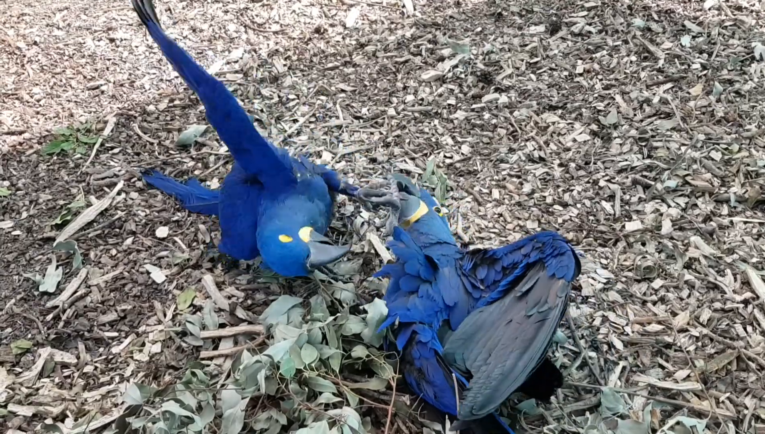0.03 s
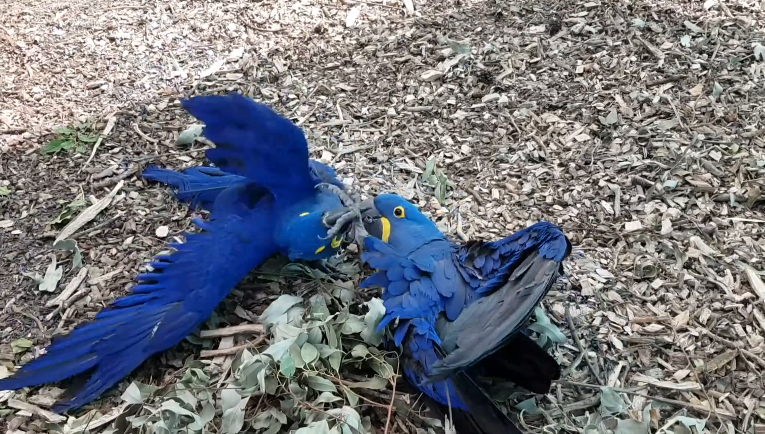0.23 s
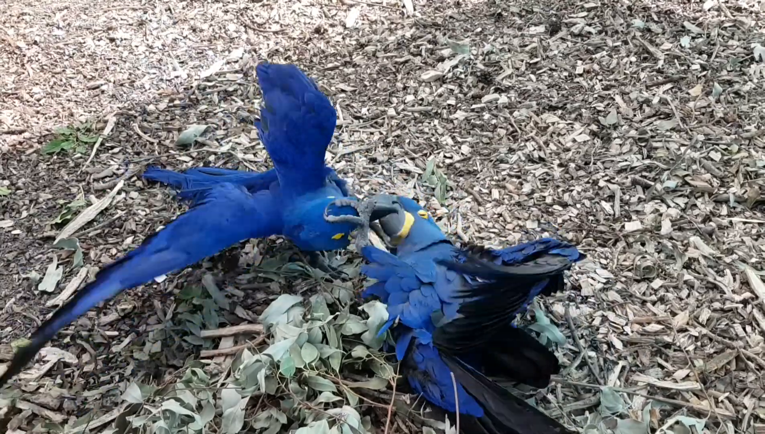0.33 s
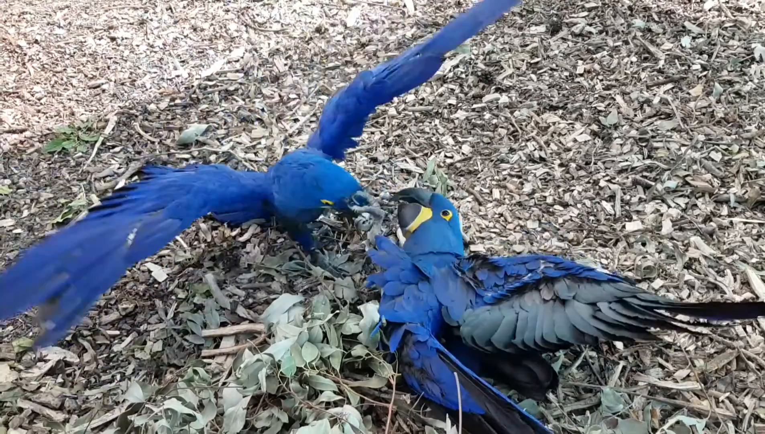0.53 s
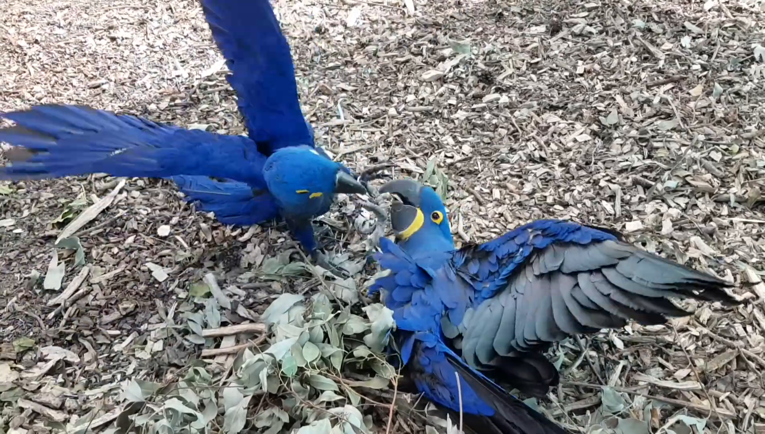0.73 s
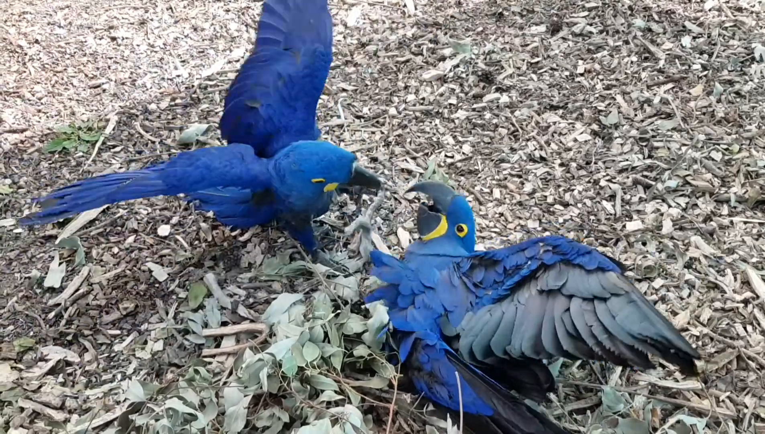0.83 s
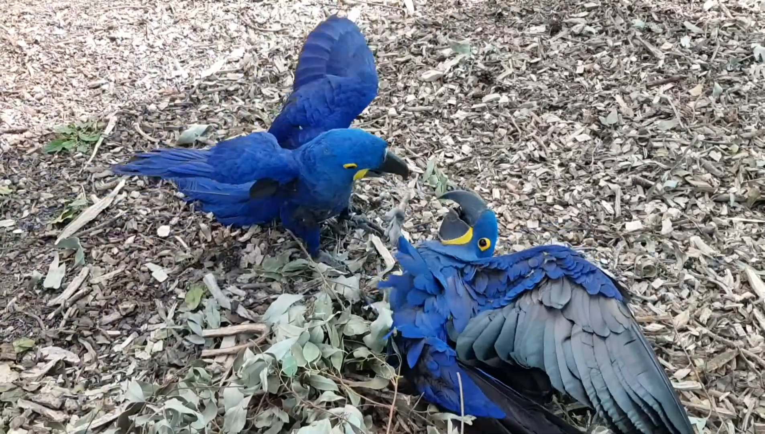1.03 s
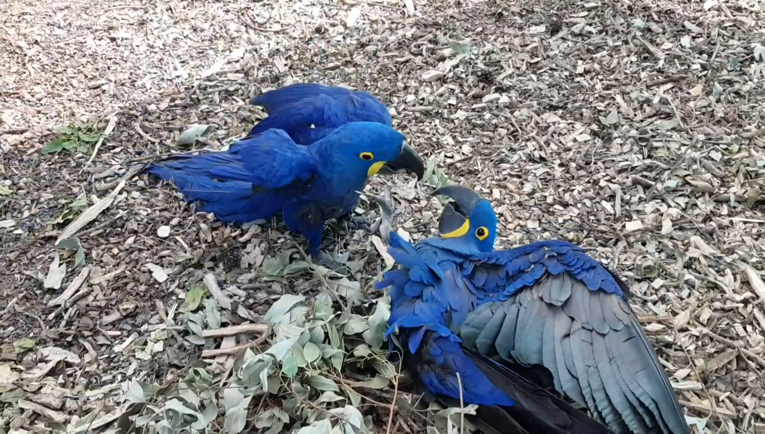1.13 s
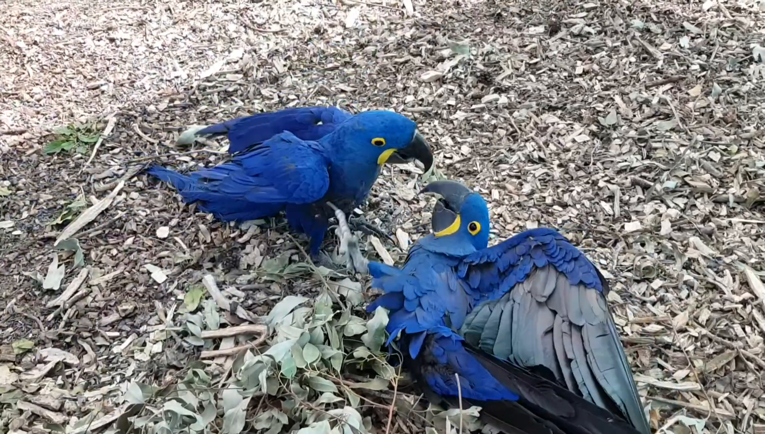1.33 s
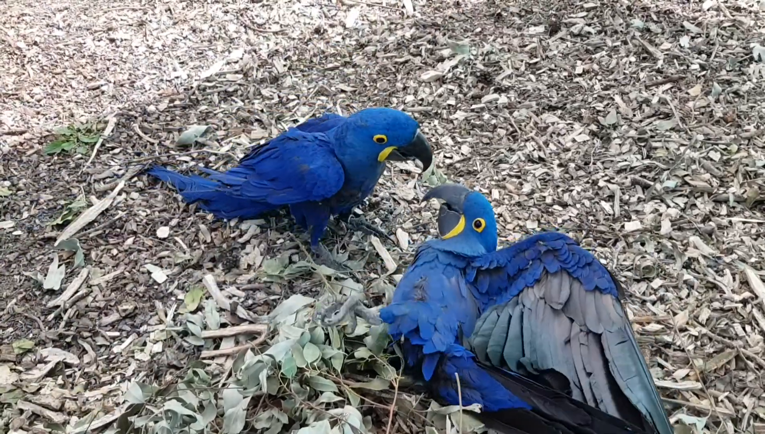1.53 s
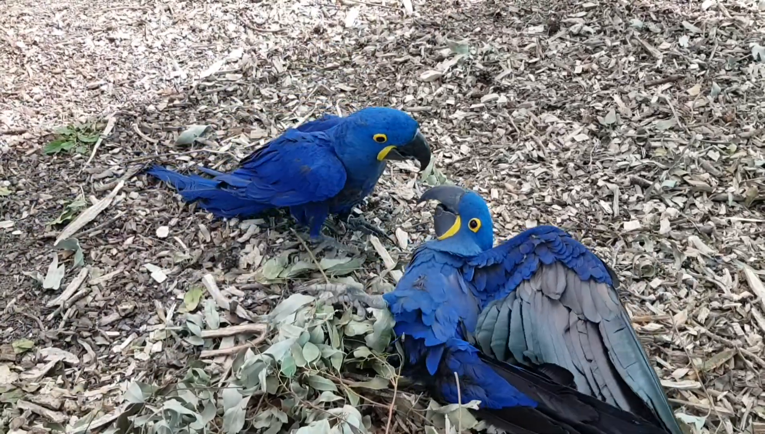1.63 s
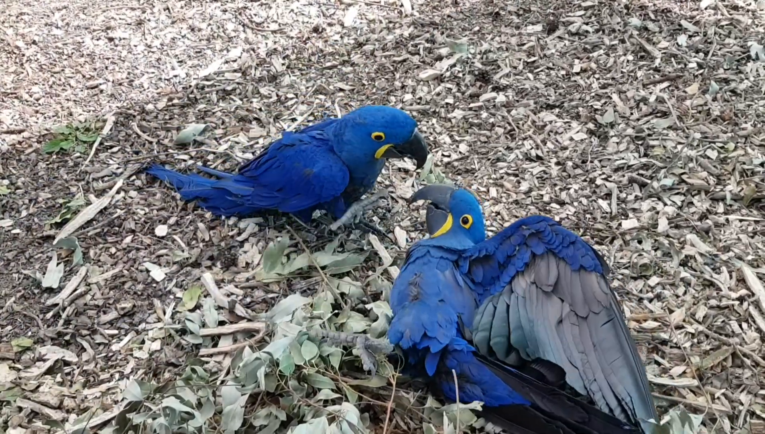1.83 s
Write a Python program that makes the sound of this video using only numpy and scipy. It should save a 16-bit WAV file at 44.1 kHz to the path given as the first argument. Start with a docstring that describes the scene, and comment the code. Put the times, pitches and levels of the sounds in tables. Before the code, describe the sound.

Close to the microphone, a large parrot lets out one raspy squawk followed by a lower, rough call. Soft wing rustles and small knocks on wood chips follow, with faint distant chirps over a low aviary rumble.

```python
"""An aviary: two macaws scuffle on wood chips close by. One gives a loud squawk that keeps breaking
from tone into rasp, then a lower, stuttering growl. Both are air puffs from the syrinx ringing the
throat, whose resonances move with the beak. Feathers rustle, wings sweep, the ground knocks and
chips snap. Small birds whistle farther off, over a rumble and a low hum."""
import sys
import numpy as np
from scipy import signal
from scipy.fft import rfft, irfft, next_fast_len
from scipy.io import wavfile
from scipy.ndimage import uniform_filter1d, map_coordinates

SR = 44100
rng = np.random.default_rng(int(sys.argv[2]) if len(sys.argv) > 2 else 0)


def wrap_up_sound(samples):
    """Save the sound to the file named by the first command line argument, as 16-bit audio."""
    columns = np.atleast_2d(samples).T
    # keep every value between -1 and 1, then stretch to whole-number steps
    tamed = np.clip(columns, -1, 1)
    steps = np.round(tamed * 32767).astype(np.int16)
    wavfile.write(sys.argv[1], SR, steps)


N = 83790
FLUTTER_HZ = 220  # rate of the macaw's random pitch and level flutter


def macaw(echo_db=-25, coo_echo_db=-13, left_lead_s=5e-5):
    """Squawk, growl and coos, close and slightly left, with early and diffuse echoes."""
    # Each row: frequency in Hz, left minus right in dB.
    pan = [(300, 1), (1500, 1), (2400, -1.5), (3100, -6), (3700, -3.5), (4250, -2), (4650, -14), (5300, 3),
           (6500, 10.5), (10000, 13.5), (11500, -5), (16000, 1.5)]

    def placement(hz):
        lead = np.exp(1j * np.pi * hz * left_lead_s * np.array([[1], [-1]]))
        return sides(along(pan, hz)) * lead

    voice = amp(-1) * squawk() + growl()
    coo = coos()
    early = amp(-9) * ground_bounce(voice)
    near = filtered(voice + coo + early, placement)
    return near + aviary(amp(echo_db) * voice + amp(coo_echo_db) * coo)


def squawk():
    """Loud call flipping between tone and rasp as the beak opens wide and narrows again."""
    # Each row: time in seconds, pitch in Hz, roughness (clipped to 0-1).
    voice = [(.17, 398.6, 0.82), (.212, 464.8, .85), (.228, 480.5, 0.22), (.244, 504.3, 0.38),
             (.253, 515.4, 0.06), (.267, 536.6, 0.07), (.276, 516.4, 0.78), (.293, 538.3, 1.11),
             (.298, 563, 0.03), (.308, 591, 0.06), (.313, 534, 0.33), (.324, 602.3, 0), (.329, 559.5, 0.48),
             (.344, 602, 0), (.351, 627, 0), (.356, 590, .65), (.375, 591.4, 0.9), (.38, 607, 0.02),
             (.389, 622, 0), (.398, 554.4, 0.85), (.411, 553.4, 0.99), (.417, 555.7, 0), (.424, 563, 0.2),
             (.432, 562.6, 0.74), (.47, 522, 0.65)]
    # Each row: time in seconds, relative level in dB.
    level = [(.168, -47.5), (.194, -25), (.249, -15.5), (.253, -15), (.352, -12), (.388, -14), (.41, -16.5),
             (.421, -15), (.432, -20.5), (.445, -24), (.475, -38.5)]
    # Each row: time in seconds, beak opening 0-1.
    beak = [(.17, 0), (.21, 0.27), (.26, 0.47), (.3, 0.76), (.345, 1), (.425, 0.84), (.455, 0.2)]
    # Throat response. Each row: Hz and dB with the beak nearly closed, Hz and dB wide open.
    throat = [(109, -23, 79, -35.5), (266.5, 3, 300, -16), (414, 2, 370, -15.5), (720, -12, 760, -4.5),
              (1010, 0, 1100, 6.5), (1200, -2, 1500, -1.5), (1448, -4, 2000, -0.5), (1960, 0, 2000, -10.5),
              (2210, -23, 2700, -1.5), (2430, -13.5, 2750, -8), (2900, -8, 3550, -2),
              (3030, -35, 4700, -7.5), (4060, -17.5, 4520, -13.5), (4730, -33.5, 5100, -24),
              (5280, -27.5, 6200, -34.5), (6300, -47, 6400, -39.5), (7440, -43, 7100, -27),
              (8300, -55.5, 7700, -46), (9450, -45.5, 11000, -35.5), (11000, -55, 10000, -45),
              (13200, -45.5, 14000, -32), (14000, -58.5, 13800, -48.5)]
    return call(voice, level, beak, throat)


def growl():
    """Lower, stuttering call through a closing beak."""
    # Each row: time in seconds, pitch in Hz, roughness (clipped to 0-1).
    voice = [(.521, 599.6, 0.39), (.526, 662, 0.79), (.538, 609.7, 0.16), (.549, 549.4, 0.05),
             (.563, 614.3, 0.08), (.579, 477.3, 0.63), (.594, 488.2, 1), (.602, 479, 0), (.613, 433.5, 0),
             (.622, 464, 1.21), (.645, 469, 0.68), (.654, 448, 0), (.664, 441.7, 0.22), (.674, 460.7, .75),
             (.696, 454, 0.17), (.708, 430, 0.4), (.727, 432.6, 0), (.745, 424.8, 0.5), (.762, 438.8, .5),
             (.79, 406, 0.39)]
    # Each row: time in seconds, relative level in dB.
    level = [(.518, -37.5), (.529, -25.5), (.547, -16), (.556, -20.5), (.564, -13.5), (.574, -22),
             (.596, -25.5), (.604, -20), (.62, -28), (.648, -34.5), (.653, -20.5), (.668, -27.5),
             (.678, -25.5), (.697, -27.5), (.717, -37), (.727, -31), (.765, -28.5), (.773, -42),
             (.82, -58.5)]
    # Each row: time in seconds, beak opening 0-1.
    beak = [(.52, 0.96), (.565, .88), (.6, 0.8), (.69, 0.6), (.765, 0.02)]
    # Throat response. Each row: Hz and dB with the beak nearly closed, Hz and dB wide open.
    throat = [(110, -19, 110, -43), (267, -6, 300, -16), (410, -8, 840, -13.5), (865, -11, 950, -19),
              (1095, -12, 1100, -4.5), (1397, -10, 1390, -12), (1780, 5.5, 1770, 4),
              (2023, -8.5, 2110, -4.5), (2160, -7.5, 2380, -16), (2450, -23, 2650, -40),
              (2950, -25, 3250, -17.5), (3600, -35, 3230, -26), (4070, -18, 4500, -22.5),
              (4800, -21.5, 5150, -49.5), (5100, -28.5, 5800, -24.5), (5800, -44, 6250, -49.5),
              (8800, -50, 9040, -43.5), (8950, -48, 9950, -27.5), (9400, -44, 10600, -43),
              (16000, -56.5, 16000, -59)]
    return call(voice, level, beak, throat)


def call(voice, level, beak, throat, tremble=.13, catch_s=.0022, closing_per_db=.1, shapes=7):
    """Puffs ring the throat; rasp shakes the beak opening; a catch dips and dulls the sound."""
    # Catches of the voice. Each row: time in seconds, relative depth in dB.
    catches = [(.272, 8), (.295, 9), (.312, 9), (.329, 9), (.34, 4), (.377, 7), (.396, 10), (.412, 4),
               (.433, 6), (.552, 6), (.67, 8)]
    t = np.arange(N) / SR
    puffs, rough = syrinx(voice), curves(voice)[1]
    catch_db = sum(db * np.exp(-((t - s) / catch_s) ** 2) for s, db in catches)
    catch_db -= uniform_filter1d(catch_db, size=1800)  # keeps the mean level
    opening = curves(beak)[0] + tremble * rough * wobble(170) - closing_per_db * catch_db
    opening = np.clip(opening, 0, 1)
    closed, opened = np.hsplit(np.array(throat, float), 2)
    sound = np.zeros(N)
    for step in np.linspace(0, 1, shapes):  # crossfade between throat shapes
        weight = np.maximum(1 - np.abs(opening - step) * (shapes - 1), 0)
        sound += weight * resonate(puffs, closed + step * (opened - closed))
    power = np.abs(uniform_filter1d(uniform_filter1d(sound ** 2, 300), 300))
    flutter_db = 1.4 * np.tanh(wobble(FLUTTER_HZ)) * (.5 + 2 * rough)
    envelope = amp(curves(level)[0] + flutter_db - catch_db) * during(level)
    return sound / np.sqrt(power + 1e-9) * envelope


def syrinx(voice, waver=.02, jitter_cycles=.17, scatter_db=3.5, air_gain=.25, spread_s_per_hz=3e-7):
    """One puff per cycle; roughness scatters their timing and size and adds air noise."""
    hz, rough = curves(voice)
    rough = np.clip(rough, 0, 1)
    cycles = np.cumsum(hz * (1 + waver * wobble(FLUTTER_HZ))) / SR
    onsets = np.interp(np.arange(1, int(cycles[-1])), cycles, np.arange(N))
    i = onsets.astype(int)
    timing, size = rng.uniform(-1.053, 1, (N // 32, 2))[:len(onsets)].T * np.sqrt(3)
    onsets += jitter_cycles * rough[i] * timing * SR / hz[i]
    taps = onsets.astype(int)[:, None] + np.arange(-7, 9)
    offset = taps - onsets[:, None]
    pulse = np.sinc(offset) * np.cos(np.pi * offset / 16) ** 2  # band-limited
    strength = amp(scatter_db * np.sqrt(rough[i]) * size)
    puffs = np.bincount(np.clip(taps, 0, N - 1).ravel(), (pulse * strength[:, None]).ravel(), N)
    air = rng.standard_normal(N) * (1 + np.cos(2 * np.pi * cycles)) * np.sqrt(hz / SR)
    flow = puffs + air_gain * rough * air
    # The treble of each puff leaves the beak slightly later.
    return filtered(flow, lambda f: (f > 60) * np.exp(-1j * np.pi * spread_s_per_hz * f ** 2))


def coos(waver=.025):
    """Soft, unsteady gliding tones before and beneath the growl."""
    # Each row: start in seconds, length in seconds, first and last pitch in Hz, level in dB.
    glides = [(0.482, 0.052, 483, 516, -37.5), (.612, 0.029, 617, 648, -41),
              (0.655, 0.052, 640, 704, -41.5), (.705, 0.045, 451.7, 416, -39)]
    t, out = np.arange(N) / SR, np.zeros(N)
    for s, length_s, first_hz, last_hz, db in glides:
        progress = np.clip((t - s) / length_s, 0, 1)
        hz = (first_hz + progress * (last_hz - first_hz)) * (1 + waver * wobble(FLUTTER_HZ))
        out += amp(db) * np.sqrt(2 * np.abs(np.sin(np.pi * progress))) * sine(hz)
    return out


def rustle(gain_db=4):
    """Feathers brush over the chips: a grainy hiss."""
    # Each row: time in seconds, relative level in dB.
    level = [(.04, -55), (.2, -41.5), (.32, -47), (.89, -66), (.94, -66), (.97, -50.5), (1.036, -64),
             (1.18, -52.5), (1.242, -60.5), (1.3, -56.5), (1.41, -69), (1.466, -52), (1.544, -61),
             (1.68, -59), (1.9, -69)]
    # Each row: frequency in Hz, relative level in dB.
    spectrum = [(150, 0), (400, -2), (900, -3.5), (2000, -1), (4400, -0.5), (5700, -4), (7300, -3.5),
                (8600, -8), (11000, -1), (15500, -6.5)]
    # Each row: frequency in Hz, left minus right in dB.
    pan = [(500, 2.5), (4500, -6), (7000, 15.5), (10000, 7), (15000, 4.5)]
    grains = rng.standard_normal((2, N)) * amp(3 * wobble(350) + 1.6 * wobble(45))
    hiss = unit(filtered(grains, lambda hz: amp(along(spectrum, hz)) * sides(along(pan, hz))))
    return hiss * amp(curves(level)[0] + gain_db)


def scuffle(snap_t60_s=.0062, pan_db=3, echo_db=-15):
    """Blows ring the ground dully; wood chips snap in dry noise bursts."""
    # Each row: start in seconds, relative level in dB, contact time in seconds.
    knocks = [(0.057, -32.5, 0.0011), (1.459, -37.5, 0.00077), (1.477, -41.5, 0.00066),
              (1.483, -43.5, .0008), (1.514, -46.5, 0.0011)]
    # Ground modes. Each row: mean frequency in Hz, relative level in dB, T60 in seconds.
    modes = [(330, -2, .04), (460, -2, .022), (620, -8, .014), (1200, -16, .012), (2300, -20, .012)]
    # Each row: start in seconds, relative level in dB, centre in Hz.
    snaps = [(.837, -40, 5800), (0.959, -45.5, 9000), (1.46, -44.5, 7000), (1.795, -49, 11840)]
    t, out = np.arange(SR // 8) / SR, np.zeros(N + SR)
    for s, db, contact_s in knocks:
        attack = 1 - np.exp(-(t / contact_s) ** 2)
        ring = sum(amp(db + mode_db - 60 * t / t60_s) * np.sin(2 * np.pi * hz * rng.normal(1, .16) * t)
                   for hz, mode_db, t60_s in modes)
        out[round(s * SR):][:len(t)] += attack * ring
    for s, db, hz in snaps:
        band = signal.iirpeak(hz, Q=1.5, fs=SR)
        snap = unit(signal.lfilter(*band, rng.standard_normal(len(t))))
        out[round(s * SR):][:len(t)] += snap * amp(db - 60 * t / snap_t60_s)
    return sides(pan_db) * out[:N] + amp(echo_db) * aviary(out[:N])


def wings(half_width_oct=.33):
    """Wings and tails sweep the air and the chips: soft swells of band noise."""
    # Each row: peak time in seconds, length in seconds, centre in Hz, level in dB.
    sweeps = [(.13, .4, 80, -54), (.463, .03, 190, -46), (.775, .05, 170, -54), (.795, .06, 3400, -48)]
    t, out = np.arange(N) / SR, np.zeros(N)
    for s, length_s, hz, db in sweeps:
        noise = rng.standard_normal(N)
        air = unit(filtered(noise, lambda f: 1 / (1 + (np.log2((f + 1) / hz) / half_width_oct) ** 2)))
        out += air * amp(db) * np.exp(-(2 * (t - s) / length_s) ** 2)
    return out


def small_birds(notes_db=-1, echo_db=-7, droop_per_s=.37):
    """Far birds: two long whistles and scattered short, drooping notes; the two low notes near 1.2 s ring on
    after the macaw's calls."""
    # Whistles. Each row: time in seconds, pitch in Hz, relative level in dB.
    falling = [(.875, 3600, -63.5), (.902, 4364, -48), (.927, 4634, -46.5), (.95, 4210, -48),
               (.98, 3785, -63), (1.0, 3183, -52), (1.036, 2690, -47.5), (1.055, 2240, -52.5),
               (1.07, 1680, -54.5), (1.1, 1565, -76.5)]
    rising = [(1.572, 2620, -72), (1.583, 2580, -49), (1.6, 2536, -47), (1.62, 2330, -48),
              (1.645, 2317, -49.5), (1.665, 2394, -45), (1.69, 2810, -45), (1.708, 3030, -43),
              (1.726, 3350, -47.5), (1.74, 3456, -55)]
    # Each row: start in seconds, length in seconds, pitch in Hz, relative level in dB.
    short_notes = [(1.175, .075, 490, -54), (1.18, .06, 1620, -58), (1.38, .08, 6320, -56),
                   (1.75, .05, 4550, -55), (1.75, .1, 6800, -56)]
    t, notes = np.arange(N) / SR, np.zeros(N)
    waver = .014 * wobble(400)
    for s, length_s, hz, db in short_notes:
        droop = droop_per_s * (t - s - length_s / 2)
        envelope = np.sin(np.pi * np.clip((t - s) / length_s, 0, 1))
        notes += amp(db + notes_db) * envelope * sine(hz * (1 + waver - droop))
    return (whistle(falling, waver=.03214, echo_db=-1, pan_db=-4)
            + whistle(rising, waver=.0275, echo_db=-1.5, pan_db=-3)
            + notes + amp(echo_db) * aviary(notes))


def whistle(rows, waver, echo_db, pan_db):
    """A far bird's wavering pure tone in its echoes."""
    hz, db = curves(rows)
    tone = np.sqrt(2) * sine(hz * (1 + waver * wobble(350)))
    tone *= amp(db + 3.5 * wobble(170) - 2.5) * during(rows)
    return sides(pan_db) * (tone + amp(echo_db) * aviary(tone))


def ground_bounce(x, paths=10, drift_s=9.2e-5, drift_hz=8.84):
    """Early echoes off chips and bodies, different per side; the paths drift as the birds thrash."""
    t, out = np.arange(N) / SR, np.zeros((2, N))
    for channel in out:
        for delay_s in rng.uniform(.00058, .009, paths):
            channel += rng.choice([-1, 1]) * np.interp(t - delay_s - drift_s * wobble(drift_hz), t, x)
    return filtered(out / np.sqrt(paths), lambda hz: hz / (hz + 900))


def aviary(x, tail_samples=32768):
    """Diffuse echoes; each frequency dies at its own speed."""
    # Each row: frequency in Hz, T60 in seconds.
    decay = [(200, 0.54), (2500, 0.671), (5000, 0.39), (12000, 0.2)]
    hz, t, noise = signal.stft(rng.standard_normal((2, tail_samples)), SR, nperseg=256)
    tail = signal.istft(noise * amp(-60 * t / along(decay, hz)[:, None]), SR, nperseg=256)[1]
    return signal.fftconvolve(x[None], tail / np.linalg.norm(tail[0]), axes=1)[:, :N]


def background(rumble_db=-58.5, side_db=-7, hum_hz=101.4, hum_db=-58):
    """Distant rumble with faint hiss, and an unsteady low hum."""
    # Each row: frequency in Hz, relative level in dB.
    spectrum = [(25, -22), (48, 3.5), (75, -1), (110, -5.5), (170, -8), (300, -16.5), (600, -26.5),
                (1500, -28.5), (4500, -14), (8000, -33), (16000, -24)]
    mid, side = unit(filtered(rng.standard_normal((2, N)), lambda hz: amp(along(spectrum, hz))))
    hum = sine(hum_hz * (1 + .075 * wobble(25))) * amp(hum_db + 2.5 * wobble(14))
    return amp(rumble_db) * (mid + amp(side_db) * np.array([side, -side])) + hum


def amp(db):
    """Decibels to gain."""
    return 10 ** (np.asarray(db) / 20)


def unit(x):
    """Scale to rms 1."""
    return x / np.sqrt(np.mean(x ** 2) + 1e-20)


def sine(hz):
    """Sine following a per-sample frequency."""
    return np.sin(2 * np.pi * np.cumsum(hz) / SR)


def sides(db):
    """Left and right gains for a level difference."""
    return amp(np.array([[.5], [-.5]]) * db)


def along(points, hz):
    """Interpolate (Hz, value) points on a log frequency axis."""
    knots_hz, values = np.transpose(points)
    return np.interp(np.log(hz + 1), np.log(knots_hz + 1), values)


def curves(rows):
    """One value per sample for each column after the time."""
    times_s, *columns = np.transpose(rows)
    return [np.interp(np.arange(N) / SR, times_s, column) for column in columns]


def during(rows, fade_s=.0057):
    """1 between the first and last row's times, with short fades."""
    t = np.arange(N) / SR
    return np.clip(np.minimum(t - rows[0][0], rows[-1][0] - t) / fade_s + 1, 0, 1)


def wobble(rate_hz):
    """Smooth random curve, rate_hz knots a second."""
    return map_coordinates(rng.standard_normal(N // 8), [np.arange(N) * rate_hz / SR], mode="wrap")


def filtered(x, response):
    """Apply a complex response, given as a function of Hz."""
    size = next_fast_len(N + SR // 2)
    return irfft(rfft(x, size) * response(np.fft.rfftfreq(size, 1 / SR)), size)[..., :N]


def resonate(x, spectrum, size=2048):
    """Minimum-phase filter with the given (Hz, dB) shape."""
    cepstrum = irfft(np.log(amp(along(spectrum, np.fft.rfftfreq(size, 1 / SR)))))
    cepstrum[1:size // 2] *= 2
    cepstrum[size // 2 + 1:] = 0
    return signal.fftconvolve(x, irfft(np.exp(rfft(cepstrum))))[:N]


def scene():
    """All sources, in stereo."""
    return macaw() + small_birds() + rustle() + wings() + scuffle() + background()


def record(dry):
    """Brick-wall low-pass."""
    return filtered(dry, lambda hz: hz < 15850)


dry = scene()
out = record(dry)
wrap_up_sound(out)
```